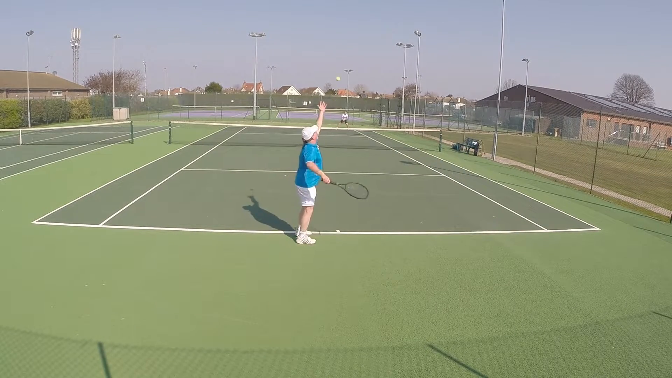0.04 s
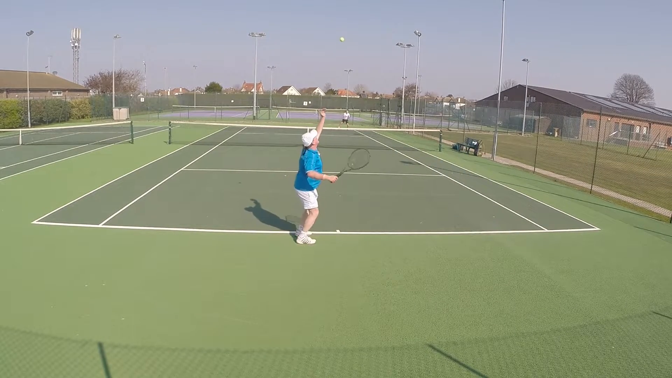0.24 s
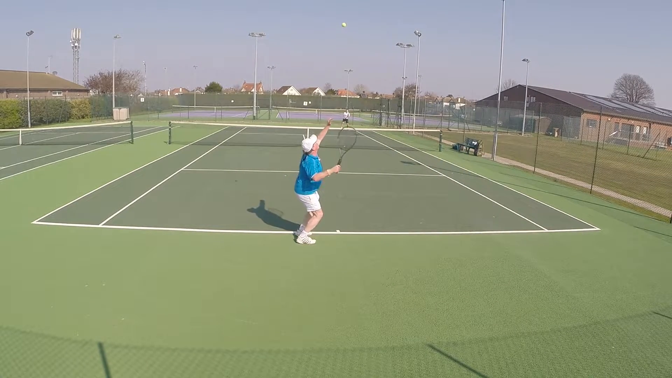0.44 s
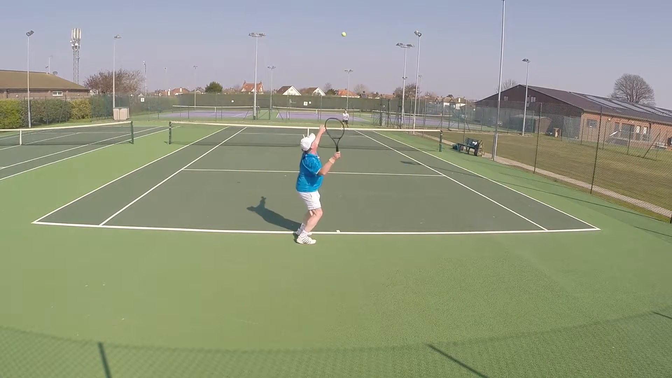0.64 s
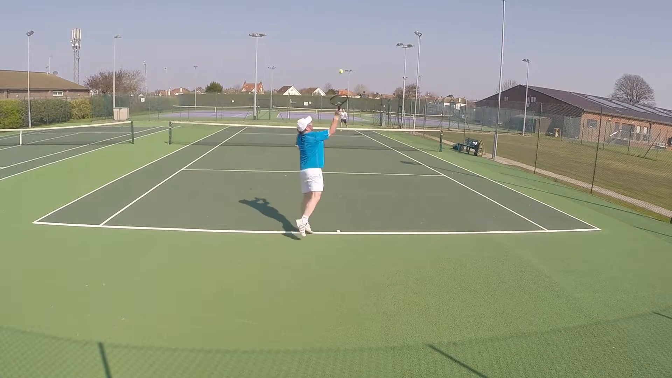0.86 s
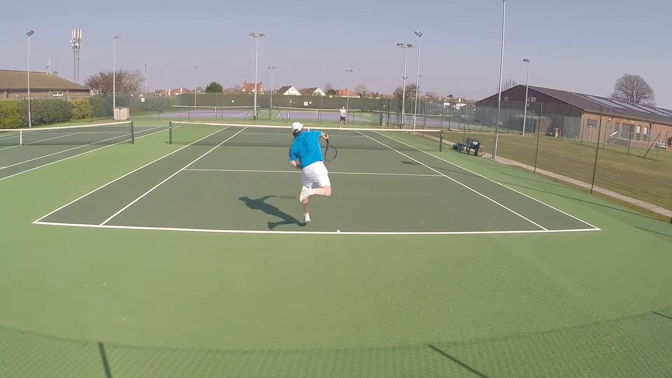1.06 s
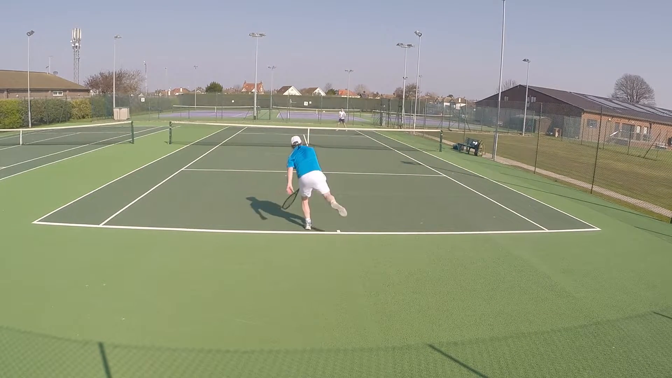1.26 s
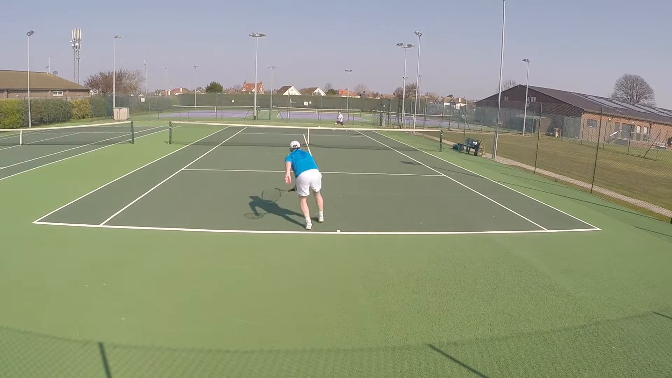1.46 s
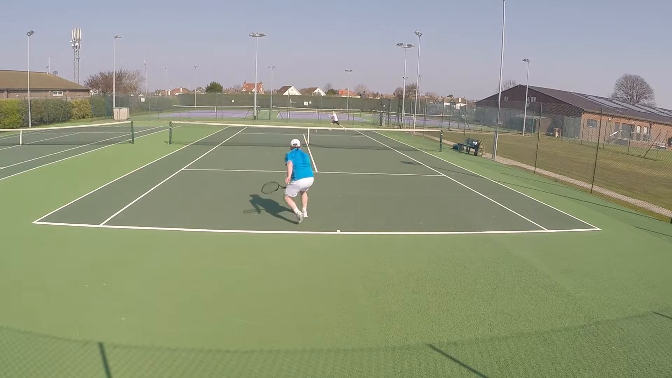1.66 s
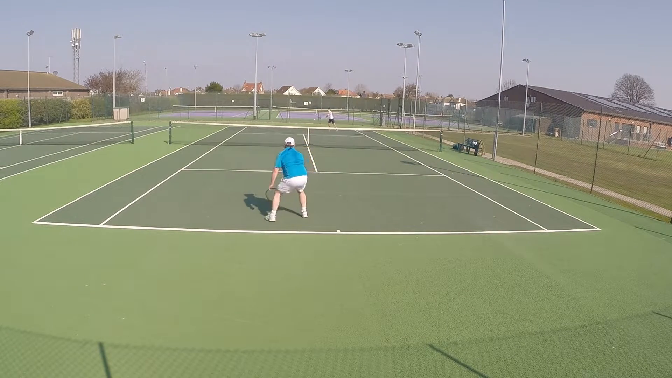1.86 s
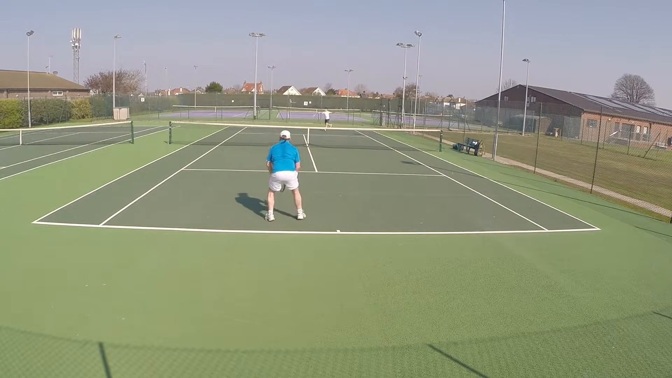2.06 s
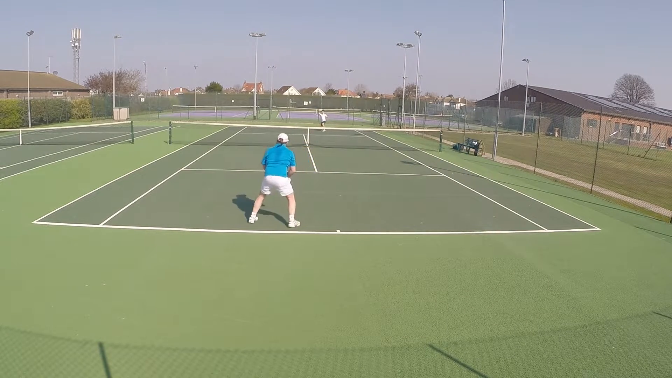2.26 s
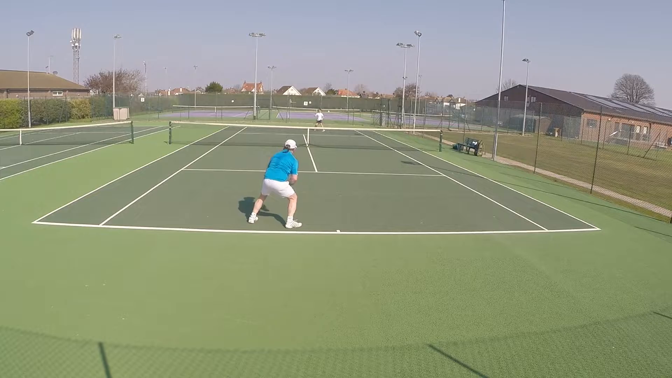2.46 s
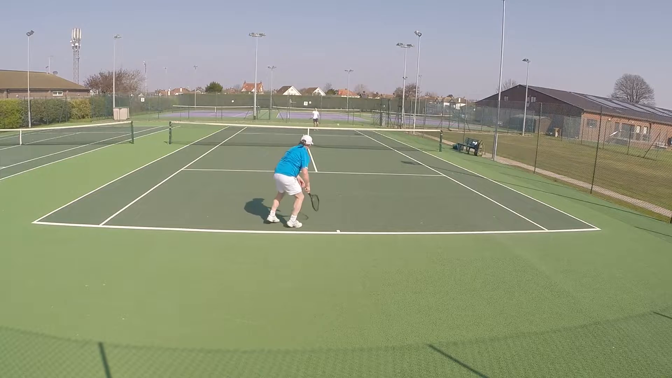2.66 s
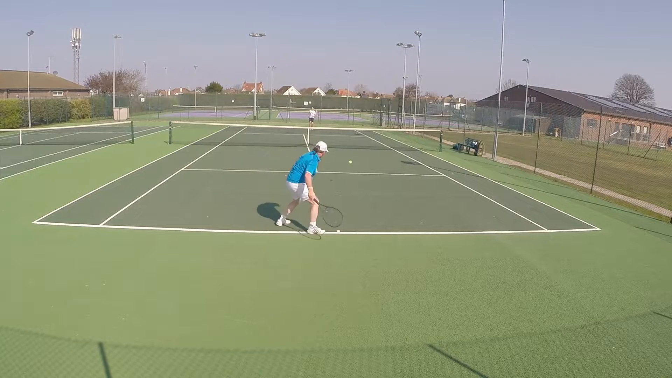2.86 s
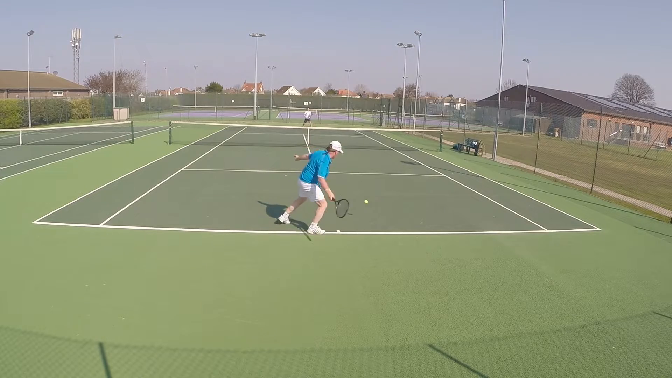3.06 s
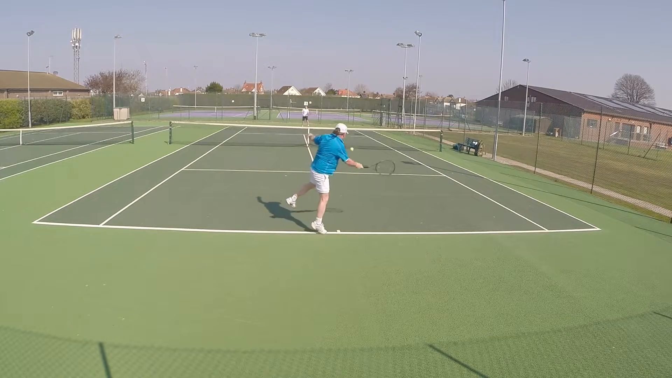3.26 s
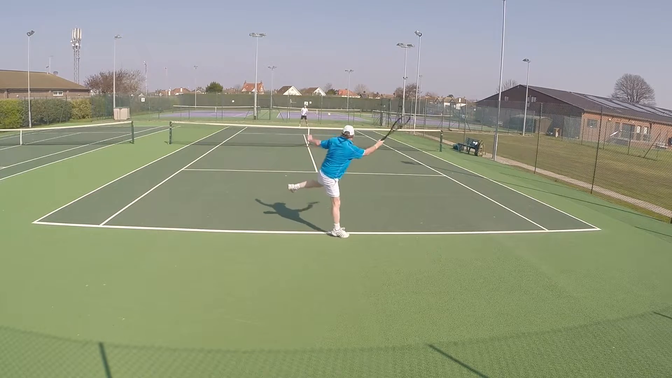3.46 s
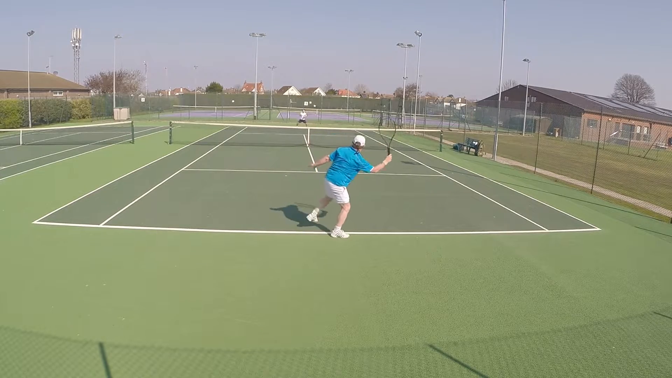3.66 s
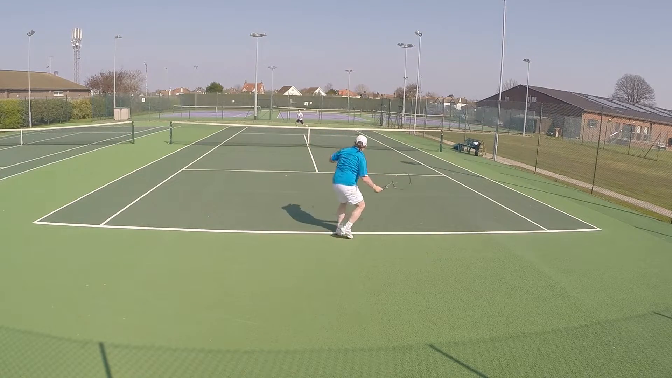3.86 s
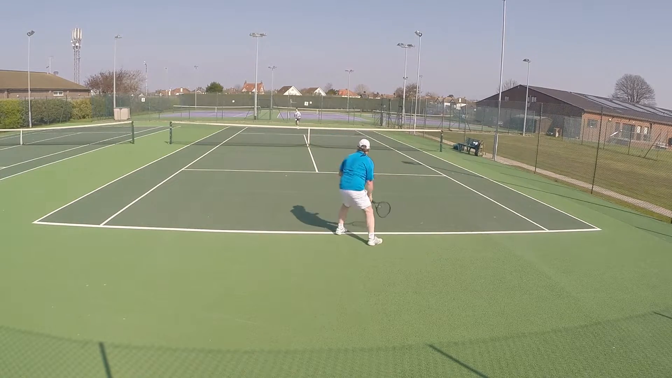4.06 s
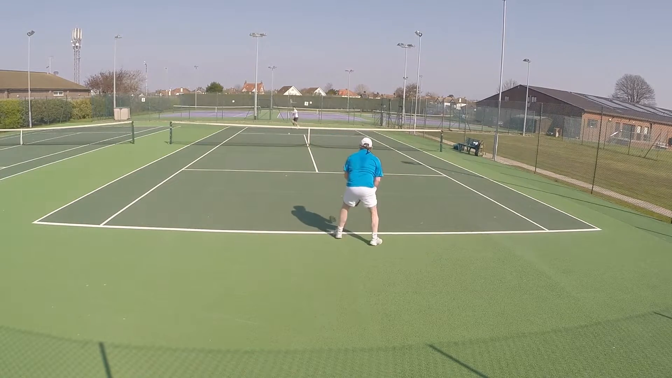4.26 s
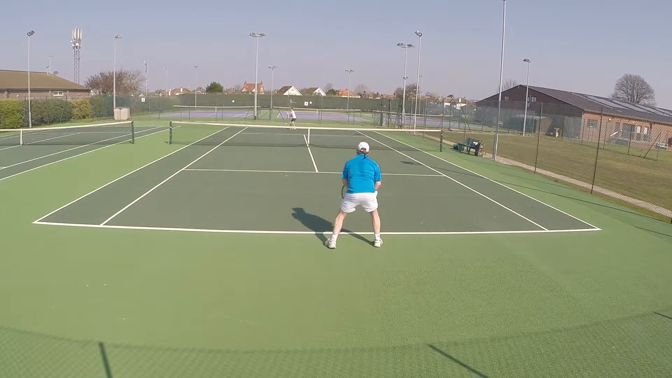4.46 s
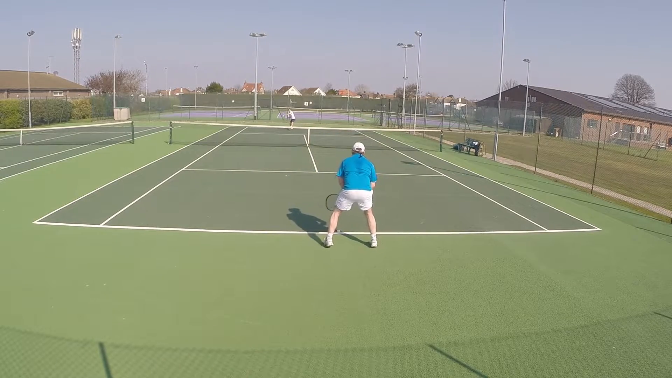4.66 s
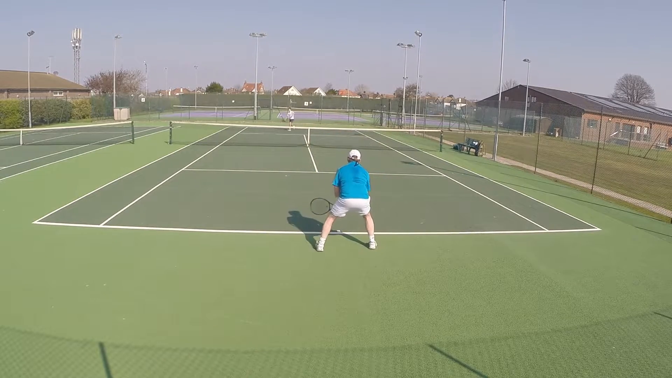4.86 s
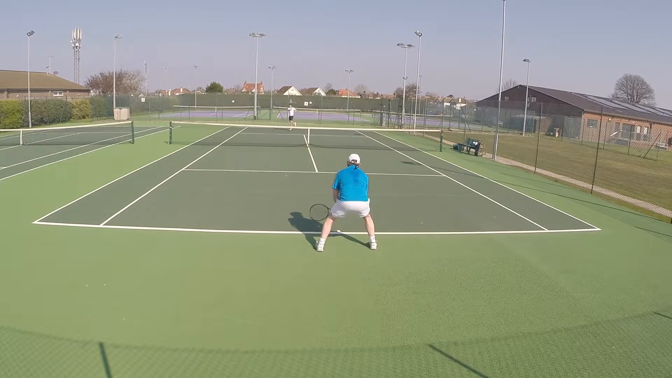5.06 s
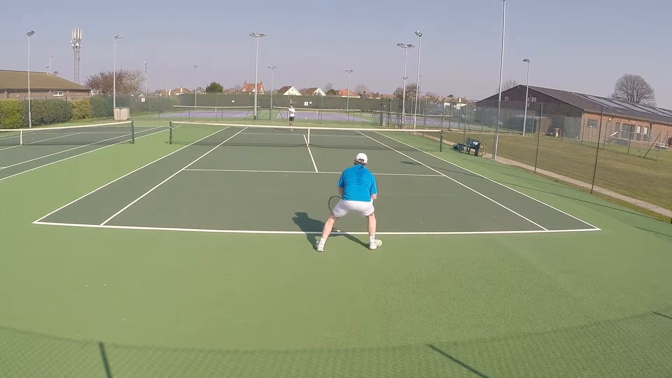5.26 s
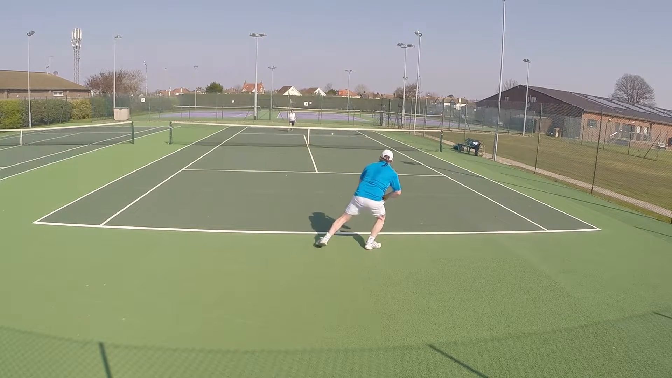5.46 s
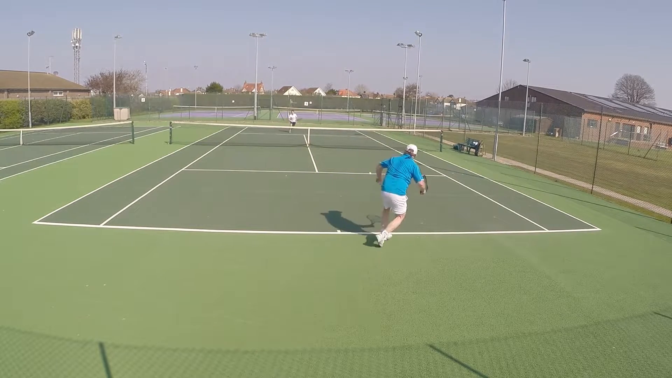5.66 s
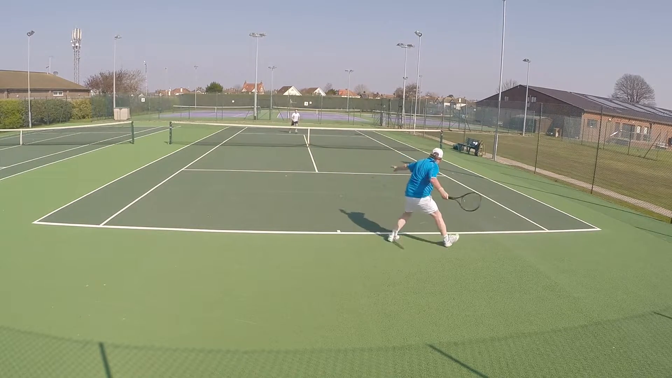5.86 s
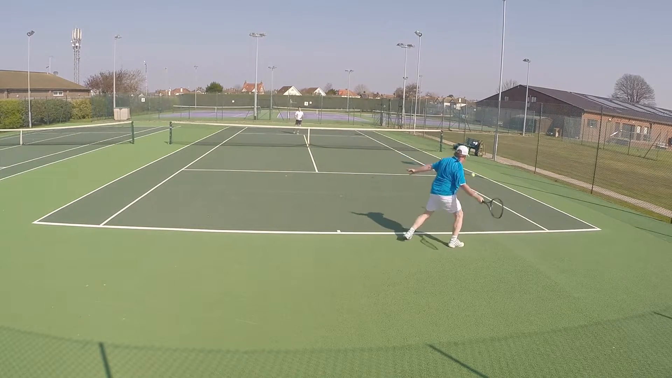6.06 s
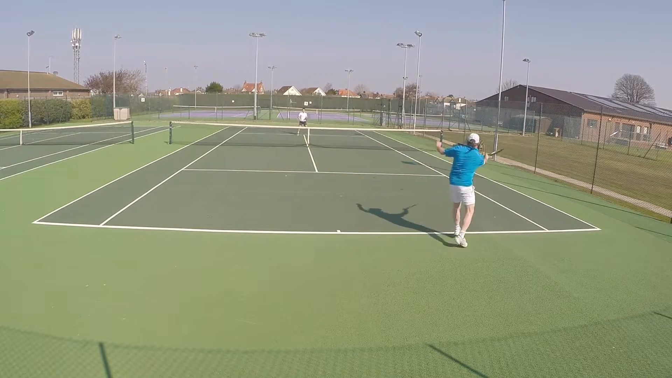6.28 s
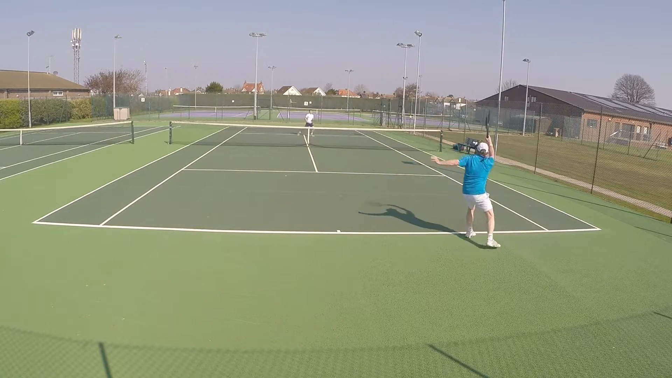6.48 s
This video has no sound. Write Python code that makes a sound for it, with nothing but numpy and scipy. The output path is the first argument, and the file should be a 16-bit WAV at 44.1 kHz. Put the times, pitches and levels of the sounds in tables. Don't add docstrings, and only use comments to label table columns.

```python
import sys
import numpy as np
from scipy import signal
from scipy.fft import rfft, irfft, next_fast_len
from scipy.io import wavfile
from scipy.ndimage import uniform_filter1d, map_coordinates

SR = 44100
rng = np.random.default_rng(int(sys.argv[2]) if len(sys.argv) > 2 else 0)


def elevation(decibels):
    levels = np.asarray(decibels, float)
    return 10 ** (levels / 20)


def to_wav(s):
    ch = np.atleast_2d(s).T
    pcm = np.round(np.clip(ch, -1, 1) * 32767)
    wavfile.write(sys.argv[1], SR, pcm.astype(np.int16))


N = 287531
GATE_DB = 24
MIDDLING_DB = -25


def unit(x):
    return x / np.sqrt(np.mean(x ** 2) + 1e-20)


def along(points, hz):
    f, v = np.transpose(points)
    return np.interp(np.log(hz + 1), np.log(f + 1), v)


def curves(rows):
    s, *cols = np.transpose(rows)
    return [np.interp(np.arange(N) / SR, s, c) for c in cols]


def wobble(rate_hz):
    knots = rng.standard_normal(int(N * rate_hz / SR) + 4)
    return map_coordinates(knots, [np.arange(N) * rate_hz / SR])


def noise(gain):
    m = next_fast_len(N)
    spectrum = rfft(rng.standard_normal(m)) * gain(np.fft.rfftfreq(m, 1 / SR))
    return unit(irfft(spectrum, m)[:N])


def band(centre_hz, width_hz):
    return noise(lambda hz: np.exp(-2 * ((hz - centre_hz) / width_hz) ** 2))


def add(track, s, sound):
    part = track[round(s * SR):][:len(sound)]
    part += sound[:len(part)]


# f/Hz, t60/s
COURT = [(150, 0.98), (1000, 0.33), (4000, 0.26), (12000, 0.059)]


def court(x):
    hz, t, z = signal.stft(rng.standard_normal(SR // 3), SR, nperseg=256)
    decay = elevation(-60 * t / along(COURT, hz)[:, None])
    tail = signal.istft(z * decay, SR, nperseg=256)[1]
    return signal.fftconvolve(x, tail / np.linalg.norm(tail))


# t/s, peak level/dB, contact/s, echo delay/s, echo level/dB
HITS = [(0.8562, -23.5, 0.0018, 0.0091, -9), (1.0845, -26.5, 0.0033, 0.0044, -1),
        (3.003, -31, 0.0038, .012, -5.5), (3.333, -26.5, 0.0018, 0.0041, -10),
        (3.7576, -27, 0.003, .0105, -5), (4.5348, -9, 0.0018, 0.014, -18.5),
        (4.9906, -26, 0.0016, 0.0071, -16), (5.3947, -28, .002, .01, -19),
        (6.355, -20.5, 0.0038, .0165, -5), (3.3501, -35.5, 0.002, 0.0046, -2),
        (3.7918, -31.5, 0.0021, 0.0079, -8), (4.9972, -34.5, 0.001, .013, -6)]
# f/Hz, level/dB, t60/s
# ball cavity near 900 Hz, strings from 1860 Hz up, soles near 130 Hz
POP_SERVE = [(267, -11, 0.024), (693, -8.5, 0.015), (890, 0, 0.038), (1090, -6, 0.03), (1271, -14.5, 0.11),
             (1600, -14.5, 0.069), (2490, -21, 0.037)]
PING_FIRST = [(141, -7.5, 0.036), (583, -14, 0.068), (1048, -12, 0.074), (1850, 5, 0.021),
              (2236, -5.5, 0.032), (2960, -8.5, 0.056), (3480, -12, 0.059), (2720, -9.5, 0.046),
              (4000, -14.5, 0.038), (4700, -11, 0.032), (5290, -10, 0.031)]
POP_BOUNCE = [(312, -10.5, 0.032), (825, -1.5, 0.038), (990, -10, 0.055), (1260, -5.5, 0.045),
              (1660, -12, 0.034)]
PING_BACKHAND = [(280, -5.5, 0.028), (527, -14, .05), (820, -9.5, 0.033), (1474, -18, 0.067),
                 (1840, 0.5, 0.016), (3030, -11, 0.041), (3490, -12, 0.033), (3850, -12.5, 0.03),
                 (4710, -6.5, .04), (4970, -6, 0.017), (7100, -19, .025), (7900, -13, 0.024)]
POP_FAR = [(150, -8, 0.039), (934, 3, 0.031), (1240, -16, 0.045), (1370, -8, 0.07), (1620, -28, 0.036)]
POP_DRIVE = [(164, -15, .08), (319, -16.5, 0.062), (799, -11, .035), (905, 1, 0.034), (1300, -7, 0.035),
             (1520, -2, 0.025), (1839, -3.5, 0.017), (2893, -22, 0.026), (3830, -36, 0.054),
             (5200, -38.5, 0.026)]
SOLE_HEEL = [(138, 1, 0.031), (594, -14, 0.079), (914, -18, .05), (1100, -22, 0.046), (1350, -24, 0.035),
             (2000, -22, 0.033)]
SOLE_FLAT = [(119.6, 1.5, 0.031), (455, -9.5, 0.033), (965, -18.5, 0.045), (1440, -29, .04)]
PING_FOREHAND = [(368, -16.5, 0.044), (705, -9.5, 0.022), (1227, -18.5, 0.061), (1600, -17, .06),
                 (1914, -1, 0.037), (2624, -18, 0.036), (3750, -10.5, 0.023), (5040, -8.5, 0.027),
                 (6995, -17, 0.032), (3020, -18, 0.058)]
AFTER_PING = [(1422, 2, 0.041), (1735, 0.5, 0.022), (3500, -7, .025), (7000, -14, .03)]
AFTER_POP = [(173, 1.5, 0.056), (420, -5, 0.026), (960, -2, .04)]
AFTER_HEEL = [(595, -3, 0.043), (913, 0, 0.057), (1114, -8, .05), (1350, -3.5, 0.042)]
# crack level/dB, court-scattered share/dB, gate hold/s
BALL, DRIVE, STRINGS = (-27, -11, .056), (-38, -12, .057), (-7.5, -13, .058)
SOLE, REBOUND, RATTLE = (-33, -14, .056), (-21, -13, .057), (-25, -23, .045)
STRUCK = [(BALL, POP_SERVE), (STRINGS, PING_FIRST), (BALL, POP_BOUNCE), (STRINGS, PING_BACKHAND),
          (BALL, POP_FAR), (DRIVE, POP_DRIVE), (SOLE, SOLE_HEEL), (SOLE, SOLE_FLAT),
          (STRINGS, PING_FOREHAND), (RATTLE, AFTER_PING), (REBOUND, AFTER_POP), (REBOUND, AFTER_HEEL)]
SOFTER_DB = 6
NEARNESS = .75


def mode(hz, level_db, t60_s, t, rough):
    walk = np.cumsum(rng.standard_normal(len(t))) * (hz / 1000) ** 0.248 / np.sqrt(SR)
    drift = rough * uniform_filter1d(walk - walk[0], size=40)
    return elevation(level_db - 60 * t / t60_s) * np.sin(2 * np.pi * hz * t + drift)


def contacts(rough):
    track, t = np.zeros(N), np.arange(SR // 8) / SR
    for (s, db, contact_s, delay_s, echo_db), (kind, modes) in zip(HITS, STRUCK):
        crack_db, scatter_db, _ = kind
        felt = signal.lfilter([1, -1], np.poly([.8, .5, .45]), rng.standard_normal(len(t)))
        crack_db = crack_db - SOFTER_DB * np.log2(contact_s / .002) - 4.0
        blow = elevation(crack_db - 60 * t / 0.03) * felt
        for hz, level_db, t60_s in modes:
            blow = blow + mode(hz, level_db, t60_s, t, rough)
        onset = np.sin(np.pi / 2 * np.clip(t / contact_s, 0, 1)) ** 2
        blow = elevation(db + 2.5) * blow * onset
        add(track, s, blow)
        add(track, s + delay_s, elevation(echo_db) * uniform_filter1d(blow, size=11))
        scatter_db = scatter_db - NEARNESS * (db - MIDDLING_DB)
        add(track, s + .004, elevation(scatter_db) * court(blow))
    return track


# t/s, peak level/dB, f/Hz, click level/dB
TAPS = [(1.7604, -61, 1960, -13), (2.2794, -61, 1260, -8), (2.298, -55.5, 1350, -23),
        (2.374, -63.5, 1710, -5), (3.171, -59, 1830, -16), (3.189, -56.5, 1410, -21),
        (3.9764, -63, 1840, -15), (4.3942, -58, 890, -24), (4.4228, -58, 1090, -23),
        (4.4644, -60, 900, -18), (5.23, -61, 1900, -3), (5.25, -61, 1220, -20), (5.3193, -65, 904, -2),
        (5.8644, -63, 1810, -21), (5.8825, -59, 1480, -22)]
TICKS = [
    (2.278, -69, 8600, -20),
    (2.279, -63, 1950, -18),
    (5.23, -71, 8700, -20),
]


def taps():
    track, t = np.zeros(N), np.arange(SR // 20) / SR
    for s, db, hz, click_db in TAPS + TICKS:
        drift = .16 * np.cumsum(rng.standard_normal(len(t)))
        ring = elevation(-60 * t / 0.025) * np.sin(2 * np.pi * hz * t + drift)
        dull = uniform_filter1d(rng.standard_normal(len(t)), size=4)
        click = elevation(click_db + 6 - 60 * t / .025) * dull
        onset = 1 - np.exp(-t / 0.0015)
        add(track, s, elevation(db + 4) * (ring + click) * onset)
    return track


# t/s, f/Hz, level/dB
SQUEAK = [
    (3.645, 1950, -89),
    (3.665, 1916, -74.5),
    (3.69, 1960, -72),
    (3.703, 1910, -78),
    (3.715, 2000, -69),
    (3.73, 2000, -92),
]


def squeak():
    hz, db = curves(SQUEAK)
    phase = 2 * np.pi * np.cumsum(hz * (1 + 0.02 * wobble(400))) / SR
    upper = elevation(-2 + 5 * wobble(60)) * np.sin(1.41 * phase)
    silenced_db = 40 * (db < -94)
    return elevation(db - 3.5 - silenced_db + 3.1 * wobble(74)) * (np.sin(phase) + upper)


# t/s, length/s, f/Hz, width/Hz, level/dB
SWISHES = [
    (1.47, 0.047, 2860, 1600, -78),
    (4.435, .05, 1100, 491.7, -72),
    (4.805, 0.068, 1010, 400, -74.5),
]


def swishes():
    t, track = np.arange(N) / SR, np.zeros(N)
    for s, length_s, hz, width_hz, db in SWISHES:
        swell = np.exp(-((t - s) / length_s) ** 2)
        track = track + elevation(db) * swell * band(hz, width_hz)
    return track


# t/s, rumble level/dB, rush level/dB
AIR_DB = [(0.0, -70, -72.5), (6.52, -68.5, -72)]
# f/Hz, level per Hz/dB
RUMBLE = [(12, -35), (20, -5.5), (60, -1.5), (92, -6.5), (118, -1.5), (155, -3.5), (284, -9.5), (500, -17),
          (650, -42.5), (1100, -120)]
RUSH = [(60, -29.5), (250, -6), (500, -0.5), (1000, -3), (2000, -8), (4500, -13.5), (6000, -18.5),
        (9300, -23), (10500, -23), (12500, -17.5), (13600, -26), (15300, -21.5), (16500, -38.5)]


def air():
    rumble_db, rush_db = curves(AIR_DB)
    rumble = elevation(rumble_db + 1.4 * wobble(4.3)) * noise(lambda hz: elevation(along(RUMBLE, hz)))
    rush = elevation(rush_db + 0.23 * wobble(11)) * noise(lambda hz: elevation(along(RUSH, hz)))
    return rumble + rush


# f/Hz, width/Hz, level/dB
CONVERTER = [(5023, 200, -88), (10000, 350, -90), (14596, 446, -91)]
# first t/s, period/s
WRITERS = [(.012, .25), (.125, .314)]
WRITE_S, WRITE_JITTER_S = .026, .008
FRAME_HZ = 59.94
LINE_HZ = 232 * FRAME_HZ + .62


def electronics():
    t = np.arange(N) / SR
    frame = t * FRAME_HZ % 1
    reading = uniform_filter1d(1. - (frame > .04) * (frame < .30), size=3)
    out = elevation(-86.5) * (.12 + 0.99 * reading) * np.sin(2 * np.pi * LINE_HZ * t)
    for centre_hz, width_hz, db in CONVERTER:
        out = out + elevation(db) * (0.28 + 0.701 * reading) * band(centre_hz, width_hz)
    blip = elevation(-90) * (np.sin(2 * np.pi * 11278 * t) + band(11330, 160))
    busy = np.zeros(N)
    for first_s, period_s in WRITERS:
        for s in np.arange(first_s, N / SR, period_s):
            start_s = s + WRITE_JITTER_S * rng.standard_normal() - WRITE_S / 2
            add(busy, max(start_s, 0), np.ones(round(WRITE_S * SR)))
    return out + uniform_filter1d(np.minimum(busy, 1), size=150) * blip


def scene():
    quiet = air() + electronics() + taps() + squeak() + swishes()
    return (contacts(rough=16.0) + elevation(GATE_DB) * quiet)[None]


HOLD_S_PER_DB = .00115
TOP_HZ = 15290


def gate():
    t, opened = np.arange(N) / SR, np.zeros(N)
    for (s, db, *_), ((*_, hold_s), _) in zip(HITS, STRUCK):
        hold_s = hold_s + HOLD_S_PER_DB * (db - MIDDLING_DB)
        opening = np.clip(1 + (t - s - .002) / .012, 0, 1)
        closing = np.clip(1 - (t - s - hold_s) / 0.1, 0, 1)
        opened = np.maximum(opened, opening * closing)
    return opened


def roll_off(x):
    return signal.sosfilt(signal.butter(12, 16270, fs=SR, output="sos"), x)


def record(dry):
    gated = dry * elevation(GATE_DB * (gate() - 1))
    m = next_fast_len(N)
    edge = np.clip((TOP_HZ + 60 - np.fft.rfftfreq(m, 1 / SR)) / 120, 0, 1)
    limited = irfft(rfft(gated, m) * elevation(-30 * (1 - edge)), m)[:, :N]
    return roll_off(limited)


dry = scene()
out = record(dry)
to_wav(out)
```